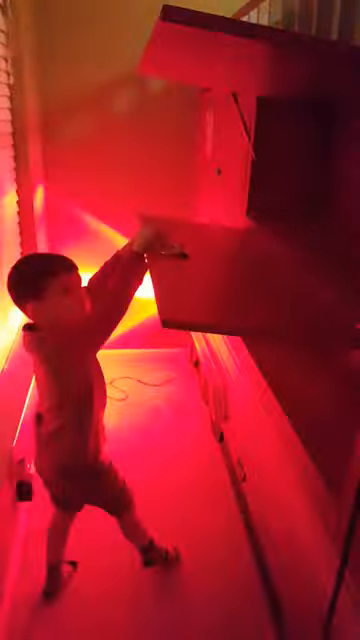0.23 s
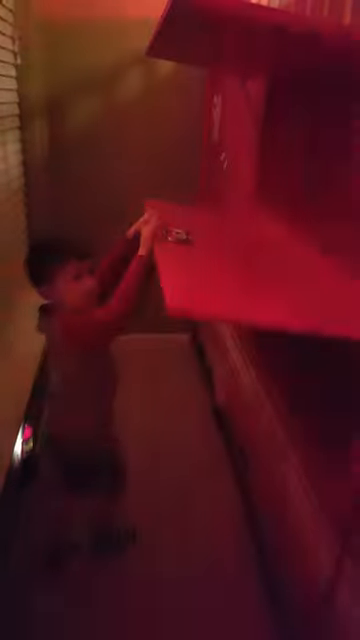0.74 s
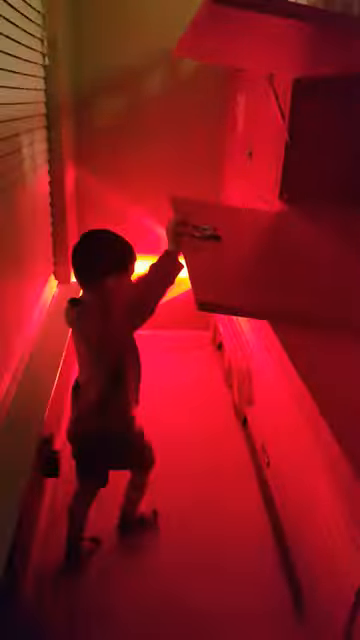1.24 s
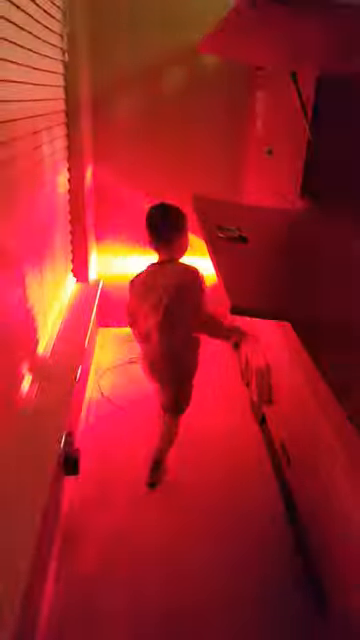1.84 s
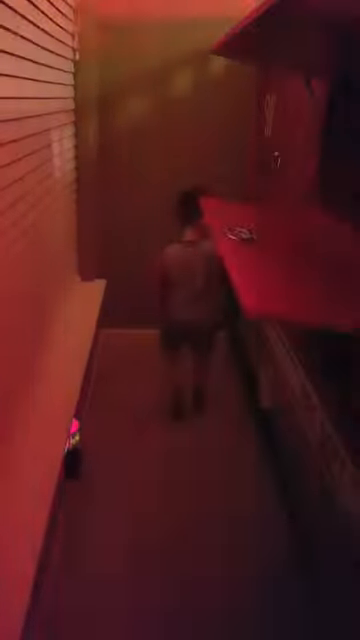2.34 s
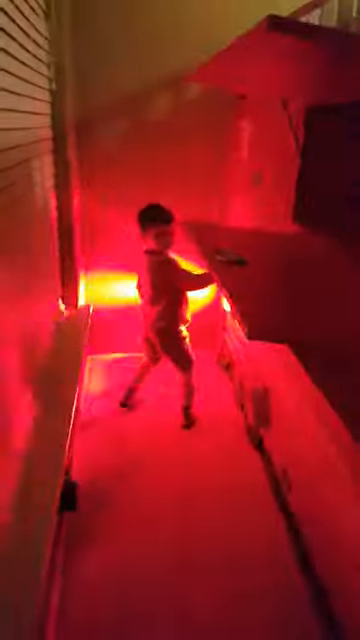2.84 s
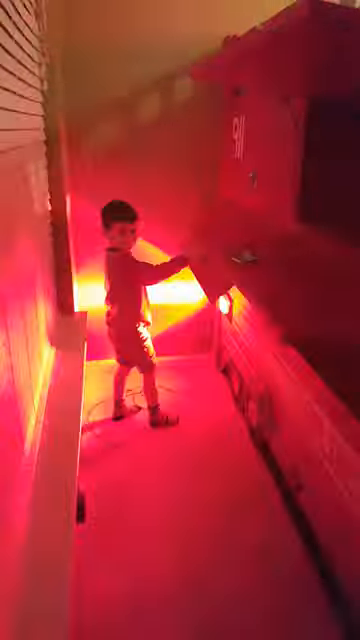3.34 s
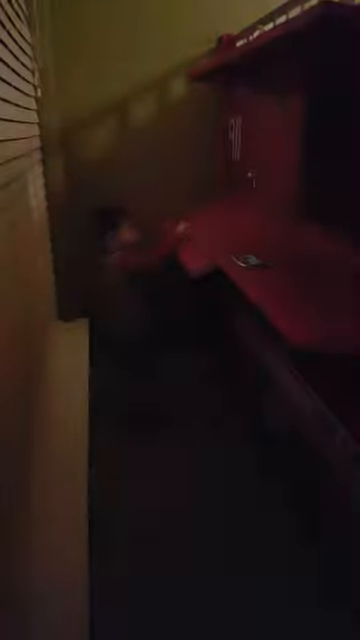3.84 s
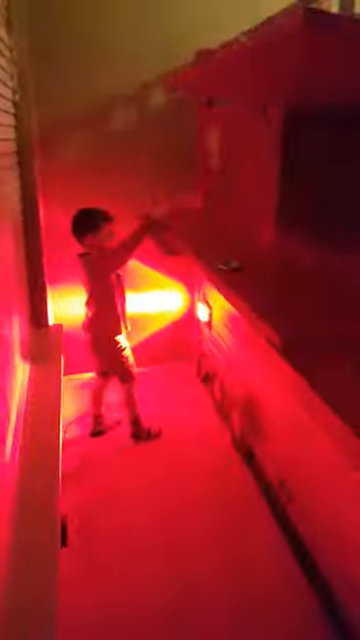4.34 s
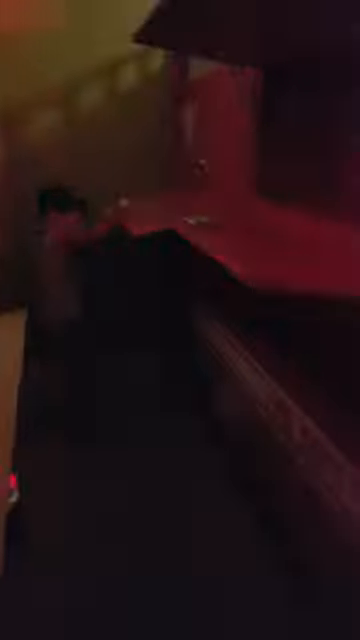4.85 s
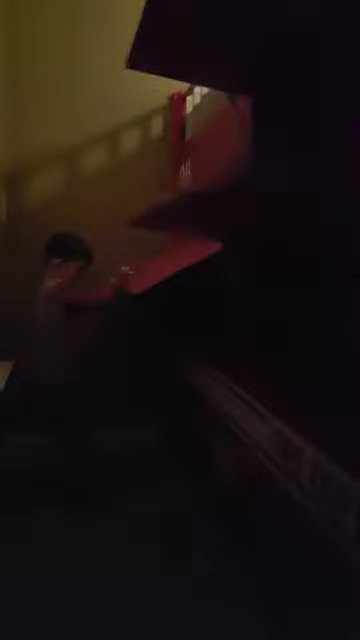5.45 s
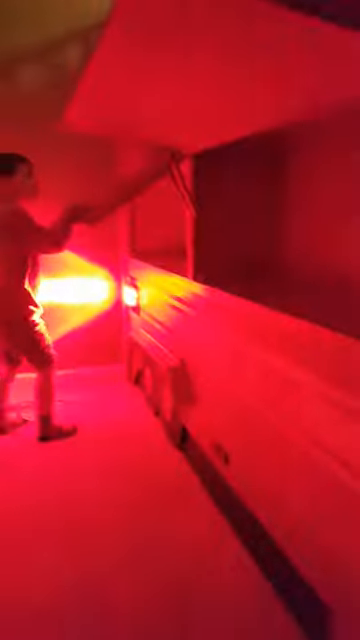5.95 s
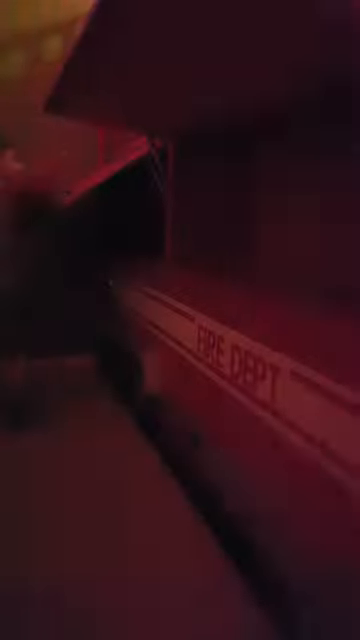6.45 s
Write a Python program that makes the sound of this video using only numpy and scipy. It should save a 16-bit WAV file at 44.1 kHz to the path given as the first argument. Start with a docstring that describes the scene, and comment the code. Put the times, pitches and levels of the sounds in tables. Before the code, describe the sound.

Plywood compartment doors on a bed are lifted and shut by hand in a small bedroom. A quick cluster of sharp knocks comes first, then a lull with soft footsteps and rustling sleeves. Two more hard knocks lead into a run of lighter ratcheting clicks and clatter, then a scrape and several final knocks. The phone microphone picks up brief room reverberation, a few finger ticks and faint hiss.

```python
"""A small bedroom, where plywood compartment doors on a bed are lifted, latched and dropped by hand.
Latches and stays knock and ratchet, driving the modes of the panels and the reverberation of the room.
Feet and sleeves shuffle between the knocks, a swinging door hums and a small metal part pings.
The phone that listens through two ports is bumped once and ticked by fingers, over room tone and hiss."""
import sys
import numpy as np
from scipy import signal
from scipy.fft import rfft, irfft, next_fast_len
from scipy.io import wavfile
from scipy.ndimage import uniform_filter1d, map_coordinates

SR = 44100
rng = np.random.default_rng(int(sys.argv[2]) if len(sys.argv) > 2 else 0)


def master(y):
    """Save y as 16-bit WAV."""
    cut = np.clip(np.atleast_2d(y).T, -1, 1)
    pcm = np.round(cut * 32767)  # scale
    wavfile.write(sys.argv[1], SR, pcm.astype(np.int16))


N = 295029

# Side of the door in hand as the phone moves: (time [s], left minus right [dB])
DOOR_BALANCE = [(.1, -3.5), (.27, -6.5), (2.4, -1), (4.2, -1.5), (4.6, -0.5), (6.4, -1)]
# Knocks on the doors, and one soft low bump on the phone near the start:
# (time [s], level [dB], thud [dB], thud frequency [Hz], body [dB], edge [dB],
# strongest ring [Hz, none if <= 0], contact length [s]); thud, body and edge shape the spectrum
CONTACTS = [(0.03, -43.5, -4, 107, -4.5, -24, 0, 0.0026), (0.064, -54, 4, 169, 5.5, -25.5, 0, 0.0014),
            (0.186, -12.5, -25, 155, -23, -13, 2153, 0.0039),
            (0.211, -41.5, -15, 155, 5, -29.5, 600, 0.019),
            (0.262, -4, -20.5, 320, -10.5, -14.5, 2100, 0.0054),
            (0.289, -11.5, -14, 150, -7, -7.5, -0.5, 0.011),
            (1.274, -48.5, -12, 138, -30, -13, 2381, 0.0091),
            (1.9287, -52, -20.5, 277, -12.5, -10.5, 1204, 0.0061),
            (2.4237, -31.5, -18, 229, -7, -43, 1830, 0.011), (2.4586, -46, 8, 89, 5, -42, 582, 0.011),
            (2.51, -14, -14.5, 229, -8, -16, 1829.5, 0.006),
            (2.5979, -11.5, -12, 256.6, -4, -12, 1832, 0.0047),
            (2.8166, -25.5, -25, 260, -17.5, -12.5, 3240, 0.0089),
            (2.98, -31, 0.5, 257, -3, -24.5, 2530, 0.012), (3, -48.5, -18, 257, -21, 2.5, -2, 0.0054),
            (3.138, -37, 4, 262, -2, -35, 1820, 0.0053), (3.2395, -42.5, 0, 114, -5.5, -24, -3, 0.0085),
            (3.2745, -38.5, -22, 274, -7.5, -15, -1, 0.0066),
            (3.333, -36.5, -18, 275, -11.5, -13, 0, 0.0092),
            (3.3738, -39.5, -18, 333, -8, -14.5, -0.5, 0.0094),
            (3.434, -36, -8.5, 234, -9.5, -12.5, -10.5, 0.0058),
            (3.517, -44.5, 3, 290, 3, -32, 1100, 0.0055), (3.5575, -29.5, -8, 334, -12, -12, 2120, 0.0058),
            (3.605, -40, -8, 265, -2, -17.5, -0.5, .012), (3.6645, -30, -13, 337, -5.5, -6.5, 2840, 0.011),
            (3.7245, -31.5, -22, 312, -7.5, -10.5, 2480, 0.0056),
            (3.7803, -28.5, -11, 269, -7.5, -5, 1577, 0.0097),
            (3.8613, -34, -16, 105, -12, -14, 2480, 0.0068), (3.924, -36, -5, 255, -13.5, -2.5, 639, .0033),
            (3.964, -45.5, -1, 328, 7.5, -19.5, 2, 0.0098),
            (3.9865, -27.5, -7, 164, -9.5, -7, 2497, 0.0058), (4.0614, -19, -11, 265, -4.5, -2, 2500, 0.01),
            (4.171, -34.5, -21, 259, -9, -5.5, 0, .0098), (4.338, -39.5, -11, 102, -9.5, -4.5, 0, 0.022),
            (4.427, -26.5, -28, 277, -12, -20.5, 1.5, 0.021), (4.442, -26, -8, 248, -8, -38.5, 712, 0.01),
            (4.5618, -25, -42, 326, -11.5, -23.5, 662, 0.015),
            (4.572, -19.5, -32, 319, -12.5, -30, 696, 0.025), (4.599, -27, -36, 315, -12, -24.5, 690, .012),
            (4.6393, -39.5, -3, 250, -4, -11, 692, 0.0076),
            (4.8778, -23, -16, 259, -10.5, -21, 1264, 0.011), (5.514, -37, -18, 241, -16, -12, 689, 0.0056),
            (5.5243, -27.5, -18.5, 269, -8.5, -12, 858, 0.0042),
            (5.5997, -36, -8, 261, -12.5, -2.5, 0, 0.0013),
            (5.7016, -14, -5.5, 236, -11.5, -14, 3814, 0.0065), (6.118, -47, 2, 240, -4, -11, 1222, 0.011),
            (6.1688, -20, -18, 255, -9.5, -9, 2458, .015), (6.1871, -18, -9, 260, -9, -18.5, 1171, .0091),
            (6.306, -23, -11, 99, -11.5, -23, 797, 0.0085), (6.3814, -18.5, -12, 94, -6, -17, 2238, 0.0072)]
def knocks():
    """Impact excitation: a chattering force drives resonances and the room; brief contacts start sharper."""
    size, lag_samples, shadow_hz = 1 << 15, 2.98, 700
    out = np.zeros((2, N + size))
    t, hz = np.arange(size // 2) / SR, np.fft.rfftfreq(size, 1 / SR)
    direct = amp(-10) * np.exp(-2j * np.pi * hz * np.array([[lag_samples], [0]]) / SR)  # left is later
    for start, db, thud, thud_hz, body, edge, ring_hz, length in CONTACTS:
        chatter = rng.standard_normal(len(t))
        chatter *= amp(1.6 * rng.standard_normal(len(t) // 32 + 1).repeat(32)[:len(t)])  # uneven slips
        touch = 0.0027 / length * np.exp(-t / 0.0011)
        press = (t / length + 0.59) * np.exp(-2 * (t / length) ** 2)
        force = chatter * (touch + press) * (1 - np.exp(-t / (0.14 * length)))
        pan = np.interp(start, *np.transpose(DOOR_BALANCE))
        shadow = amp(np.outer([pan / 2, -pan / 2], hz / (hz + shadow_hz)))  # the phone shades the treble
        spectrum = rfft(force, size) * (direct + rfft(room_tail(size // 2), size)) * shadow
        # Dividing by the chance colour of the chatter lets the contact set the timbre.
        power = np.mean(np.abs(spectrum) ** 2, 0)
        chance_colour = np.sqrt(np.abs(uniform_filter1d(power, size=110)))
        air = edge - 13.5
        colour = [(40, thud - 12), (200, thud + 2), (420, body + 4), (950, body + 4), (1600, -3.5),
                  (2600, -4), (4000, -6), (5600, edge), (7500, (edge + air) / 2), (11000, air - 3),
                  (16000, air - 8)]
        ring = 1 + (ring_hz > 0) * amp(7) * resonance(hz, ring_hz, width=110)
        thump = 1 + amp(15) * resonance(hz, thud_hz, width=22) ** 2
        timbre = amp(along(colour, hz)) * panel_response(hz, spread_db=4.5) * ring * thump
        spectrum *= minimum_phase(timbre / chance_colour)
        midrange = irfft(spectrum * (hz > 1200) * (hz < 4500))
        loudest_rms = np.sqrt(uniform_filter1d(np.mean(midrange ** 2, 0), 600).max())
        out[:, round(start * SR):][:, :size] += amp(db - 4.5) * irfft(spectrum) / loudest_rms
    return out[:, :N]


# Plywood door modes: (frequency [Hz], level relative to the flat response [dB])
DOOR_MODES = [(435, -4.5), (507, -2.5), (585, 0.5), (706, 2), (790, 2), (982, -2), (1091, 0.5), (1194, -2),
              (1278, 3), (1484, 2.5), (1590, -9.5), (1676, -4.5), (1841, 3), (2060, 2), (2340, 0),
              (2626, -5), (2900, -2.5), (3300, -6), (3650, -2.5)]
def panel_response(hz, spread_db):
    """Modal superposition: each point of contact drives the door's modes at new strengths."""
    return 1 + sum(amp(db + rng.normal(0, spread_db)) * resonance(hz, centre, 14 + centre / 90) ** 2
                   for centre, db in DOOR_MODES)


# Bedroom decay: (frequency [Hz], reverberation time [s])
ROOM_T60 = [(80, 0.39), (250, 0.32), (1000, 0.26), (4000, 0.25), (12000, 0.2)]
def room_tail(size):
    """Reverberation: dense early reflections, then exponential decay at a rate set by frequency."""
    hz, t, spectra = signal.stft(rng.standard_normal((2, size)), SR, nperseg=256)
    decay = amp(-60 * t / along(ROOM_T60, hz)[:, None])
    tail = signal.istft(spectra * decay, SR, nperseg=256)[1][:, :size]
    age = np.arange(size) / SR
    early = (1 - np.exp(-age / 0.0012)) * (1 + amp(2) * np.exp(-age / 0.01))
    tail = diffuse(tail * early, lambda hz: 1)
    return tail / np.linalg.norm(tail[0])


# Continual movement of feet and hands: (time [s], level [dB])
MOVEMENT = [(0, -63.5), (.2, -56.5), (.55, -80), (1.05, -78), (1.3, -65), (1.7, -69), (2.1, -65),
            (2.5, -56), (3.1, -52.5), (3.45, -62.5), (3.65, -48), (4.15, -47.5), (4.3, -60.5), (4.7, -55.5),
            (5.0, -55), (5.4, -59), (5.47, -61.5), (5.9, -61), (6.1, -66), (6.4, -58.5), (6.69, -69)]
# Footfalls and rocking of the bed frame: (time [s], level [dB], time to decay 60 dB [s])
FOOTFALLS = [(.29, -34.5, 0.33), (.62, -66.5, 0.29), (1.1, -51.5, 0.16), (1.19, -64, .3), (1.62, -57, .4),
             (1.96, -51, 0.31), (2.22, -45, 0.34), (2.27, -49, 0.26), (2.6, -30.5, 0.69), (4.02, -57, 0.37),
             (4.4, -61, 0.44), (5.13, -53, 0.25), (5.19, -62, 0.15), (5.71, -47, 0.82), (6.2, -40.5, .5),
             (6.32, -43.5, 0.37), (6.4, -48, 0.15)]
# Scuffs, drags and rattles: (midpoint [s], length [s], rub level [dB], swish level [dB])
STROKES = [(0.337, 0.092, -26, -47), (0.478, 0.13, -56, -66), (0.657, 0.11, -64.5, -72),
           (0.93, 0.034, -73, -79.5), (1.203, 0.11, -60.5, -65.5), (1.294, 0.055, -69, -64.5),
           (1.559, 0.13, -57, -64.5), (1.646, 0.085, -60.5, -69.5), (1.947, 0.094, -61, -67),
           (2.224, .07, -49.5, -66), (2.325, 0.078, -51, -83), (2.619, 0.16, -29.5, -70),
           (2.76, 0.3, -67, -74), (4.554, 0.28, -42, -71), (5.135, 0.13, -62, -66), (5.19, 0.074, -72, -60),
           (5.361, .05, -71, -64), (5.772, 0.079, -52, -78), (5.553, 0.092, -60, -66),
           (5.925, 0.17, -69, -71)]
# Spectra of treads, rubbing and cloth: (frequency [Hz], relative spectrum level [dB])
TREAD_SPECTRUM = [(18, -44), (30, -17.5), (65, 2.5), (171, -1.5), (204, -4), (253, -7), (461, -26.5),
                  (600, -10.5), (780, -32.5), (1320, -120)]
RUB_SPECTRUM = [(150, -24.5), (250, 2), (480, -7), (593, -11.5), (669, -11), (850, -7.5), (1860, -9.5),
                (2770, -14.5), (6000, -28), (7800, -55), (13200, -120)]
CLOTH_SPECTRUM = [(1760, -29.5), (3000, -3), (3730, -3.5), (6000, -8.5), (6530, -8), (13600, -12),
                  (16000, -25.5)]
def shuffle():
    """Forced vibration: treads boom in the floor, rubbing drives the door modes, cloth swishes."""
    t = np.arange(N) / SR
    movement_db = np.interp(t, *np.transpose(MOVEMENT)) + 0.47 * wobble(3.1)
    tread_level = amp(-60.5 + 0.58 * (movement_db + 59) + 0.81 * wobble(6.9))
    for start, db, t60 in FOOTFALLS:
        tread_level += rise_and_decay(np.clip(t - start, 0, None), db, t60, rise_s=0.02)
    rub_level, swish_level = amp(movement_db), amp(movement_db - 12)
    for middle, length, rub_db, swish_db in STROKES:
        stroke = np.exp(-(2 * (t - middle) / length) ** 2)
        rub_level += amp(rub_db) * stroke
        swish_level += amp(swish_db) * stroke
    grain = wobble(40)  # roughness common to rub and swish
    tread = noise(lambda hz: amp(along(TREAD_SPECTRUM, hz)), flutter_db=2 * wobble(54))
    rub = noise(lambda hz: amp(along(RUB_SPECTRUM, hz)) * panel_response(hz, spread_db=1.5),
                flutter_db=1.3 * grain + 1.8 * wobble(200))
    swish = noise(lambda hz: amp(along(CLOTH_SPECTRUM, hz)), flutter_db=1.5 * grain + 1.7 * wobble(250))
    return tread_level * tread + rub_level * rub + swish_level * swish


# Fingers on the phone: (time [s], level [dB], relative push [dB], frequency [Hz], left minus right [dB])
FINGER_TAPS = [(0.8525, -65, -11, 7450, -9.5), (0.866, -55.5, 12, 5870, -13.5),
               (0.8939, -55.5, -13, 8000, -18), (0.9222, -57, -3, 8360, -15),
               (0.9358, -58, 20.5, 5310, -19), (0.9396, -59, 20, 5650, -17), (0.9766, -61, 19, 5960, -21),
               (4.5346, -63, 5, 6070, -3.5), (5.0655, -48, -13, 5140, -6.0), (5.0781, -40.5, 5, 6100, -18),
               (5.1369, -48, -1, 6170, -6), (5.1679, -47, 13, 9060, -19), (5.1866, -35.5, -14, 6650, -18),
               (5.3066, -49.5, -4.5, 6030, -13), (5.3504, -50.5, -4.5, 6860, -18)]
def finger_ticks():
    """Structure-borne sound: the case carries each dry click, with a slower one-sided push."""
    out, t = np.zeros((2, N + 400)), np.arange(400) / SR
    for start, db, push_db, hz, pan in FINGER_TAPS:
        click = np.exp(-t / 0.000095) * np.sin(2 * np.pi * hz * t)
        push = amp(push_db - 3.5) * (t / 0.00033) * np.exp(-t / 0.00012)
        port_gains = amp(db + 7.5) * amp([[pan / 2], [-pan / 2]])
        out[:, round(start * SR):][:, :len(t)] += port_gains * (click - push)
    return out[:, :N]


def metal_ping(start_s=5.885, hz=4100):
    """Damped oscillation: a small metal part rings once after a latch, with a soft onset."""
    age = np.clip(np.arange(N) / SR - start_s, 0, None)
    return rise_and_decay(age, db=-52, t60=0.18, rise_s=0.018) * np.sin(2 * np.pi * hz * age)


# Hums of a swinging door: (start of hold [s], length of hold [s], level [dB])
DOOR_HUMS = [(0.604, 0.13, -70.5), (1.472, 0.183, -58.5)]
def door_hum(hz=322, fade_s=0.047):
    """Random modulation: a faint tone wavers in pitch and level as it fades in, holds and fades out."""
    t = np.arange(N) / SR
    level = sum(amp(db) * np.clip(np.minimum(t - start, start + length - t) / fade_s + 1, 0, 1) ** 2
                for start, length, db in DOOR_HUMS)
    waver = amp(1.2 * wobble(32.4))
    phase = 2 * np.pi * np.cumsum(hz + 4 * wobble(24.86)) / SR
    return np.sqrt(2) * level * waver * np.sin(phase)


# Room tone and hiss: (frequency [Hz], relative spectrum level [dB])
FLOOR_SPECTRUM = [(12, -31.5), (20, 4.5), (43, -7), (135, 0), (257, -15.5), (687, -19.5), (860, -22.5),
                  (1640, -22.5), (4900, -29.5), (6680, -30), (9350, -36), (15100, -33.5), (16400, -46.5)]
def noise_floor():
    """Stationary noise: room tone and microphone hiss keep a constant spectrum."""
    return amp(-64) * noise(lambda hz: amp(along(FLOOR_SPECTRUM, hz)))


# Diffuse sound at the two ports: (frequency [Hz], left-right correlation [0 to 1])
COHERENCE = [(60, .95), (130, .96), (290, .84), (640, .5), (1400, .1), (15000, 0)]
def diffuse(pair, gain):
    """Spatial coherence: two coloured noises are alike in the bass and unrelated in the treble."""
    def mid_side_gains(hz):
        angle = np.arccos(along(COHERENCE, hz)) / 2
        return gain(hz) * np.array([np.cos(angle), np.sin(angle)])
    mid, side = filtered(pair, mid_side_gains)
    return np.array([mid + side, mid - side])


def noise(gain, flutter_db=0):
    """Diffuse noise of unit RMS, modulated in amplitude by flutter_db."""
    x = amp(flutter_db) * diffuse(rng.standard_normal((2, N)), gain)
    return x / np.sqrt(np.mean(x ** 2, axis=-1, keepdims=True) + 1e-20)


def amp(db):
    """Amplitude ratio from decibels."""
    return 10 ** (np.asarray(db) / 20)


def rise_and_decay(age, db, t60, rise_s):
    """Exponential decay with a rounded onset."""
    return amp(db - 60 * age / t60) * (1 - np.exp(-age / rise_s))


def along(points, hz):
    """Interpolation of (frequency [Hz], value) points on a logarithmic axis."""
    frequencies, values = np.transpose(points)
    return np.interp(np.log(hz + 1), np.log(frequencies + 1), values)


def filtered(x, response):
    """Linear filtering: the spectrum of x times a frequency response."""
    size = next_fast_len(x.shape[-1] + 8192)
    return irfft(rfft(x, size) * response(np.fft.rfftfreq(size, 1 / SR)), size)[..., :x.shape[-1]]


def minimum_phase(gain):
    """Causality: folding the cepstrum gives the minimum-phase response with this gain."""
    cepstrum = irfft(np.log(gain + 1e-6))
    half = cepstrum.shape[-1] // 2
    cepstrum[..., 1:half] *= 2
    cepstrum[..., half + 1:] = 0
    return np.exp(rfft(cepstrum))


def resonance(hz, centre, width):
    """Gain of one resonance, 1 at its centre; width is the half-power bandwidth [Hz]."""
    return 1 / np.sqrt(1 + ((hz - centre) / (width / 2)) ** 2)


def wobble(rate):
    """A smooth random curve with rate knots a second."""
    return map_coordinates(rng.standard_normal(int(N * rate / SR) + 4), [np.arange(N) * rate / SR])


def scene():
    """Superposition: the pressures of all sources add at each port."""
    return knocks() + shuffle() + door_hum() + metal_ping() + finger_ticks() + noise_floor()


def record(dry, ceiling=0.95, bass_hz=45, top_hz=16100):
    """Saturation and band limiting: the input stage rounds peaks, fades deep bass and cuts the top."""
    soft = dry / (1 + np.abs(dry / ceiling) ** 4) ** (1 / 4)
    return filtered(soft, lambda hz: (hz < top_hz) / np.sqrt(1 + (bass_hz / (hz + 1)) ** 4))


dry = scene()
out = record(dry)
master(out)
```